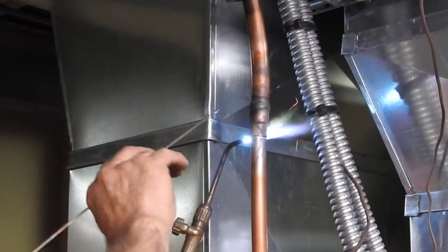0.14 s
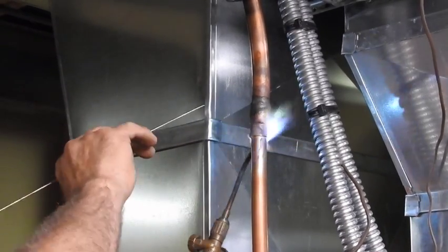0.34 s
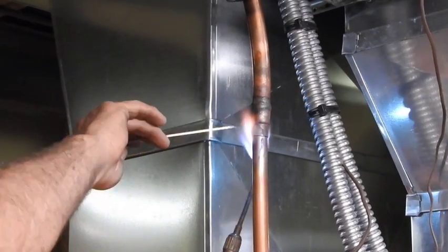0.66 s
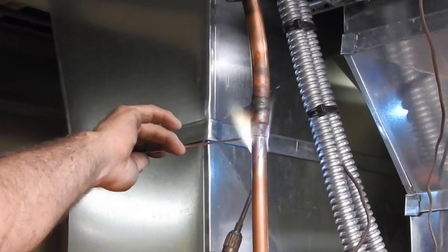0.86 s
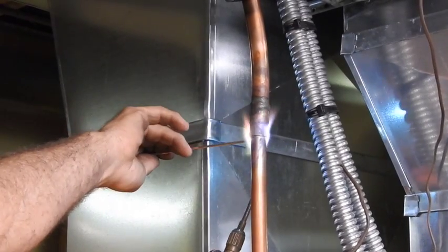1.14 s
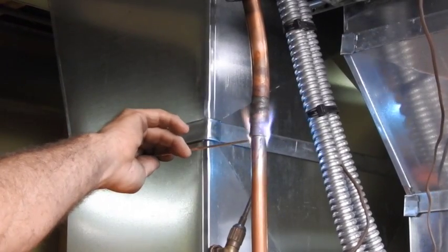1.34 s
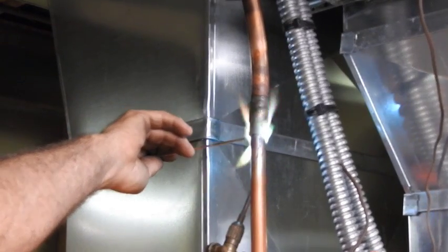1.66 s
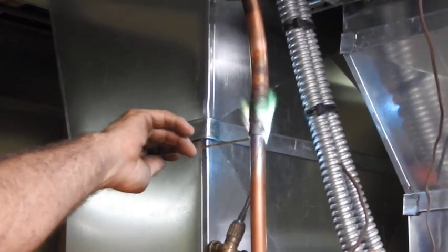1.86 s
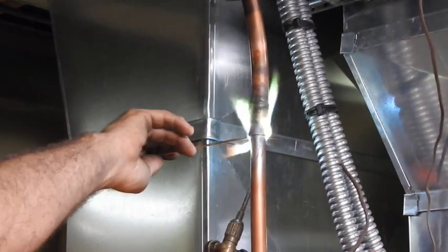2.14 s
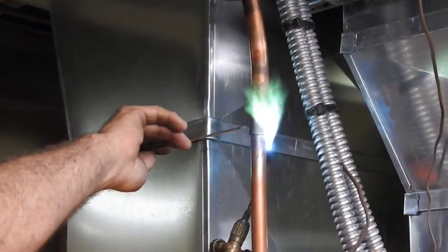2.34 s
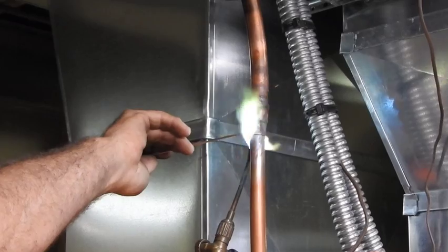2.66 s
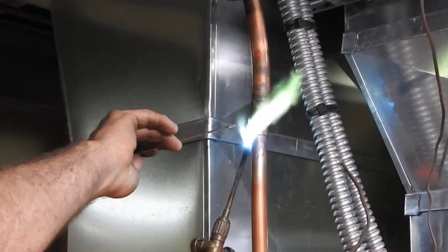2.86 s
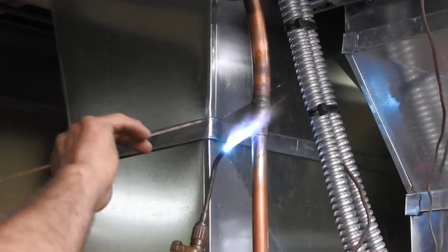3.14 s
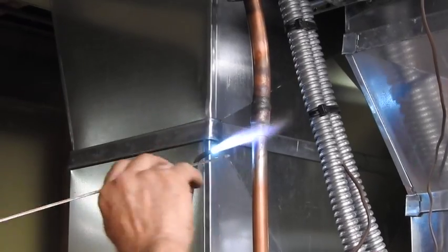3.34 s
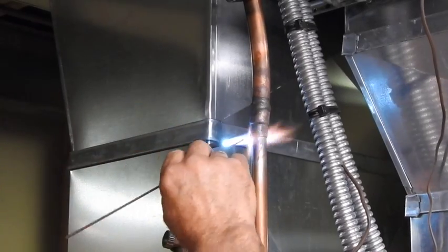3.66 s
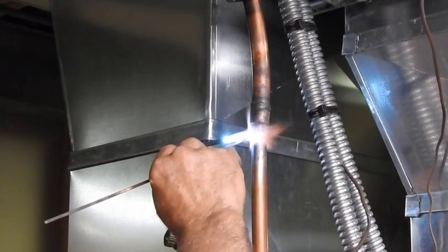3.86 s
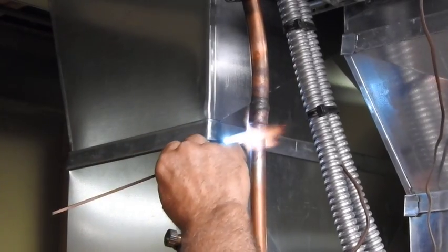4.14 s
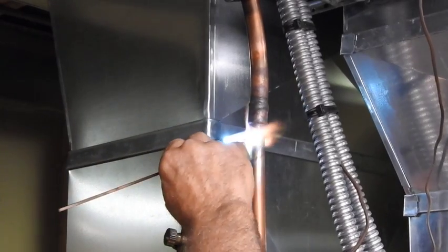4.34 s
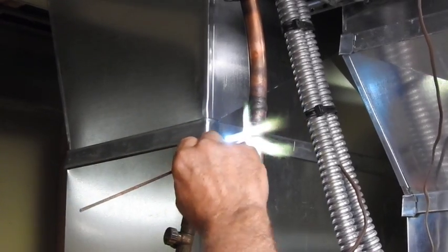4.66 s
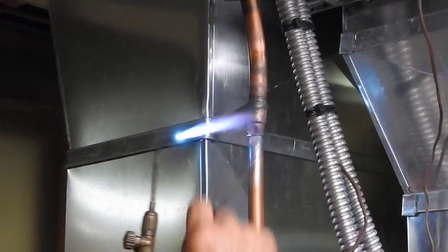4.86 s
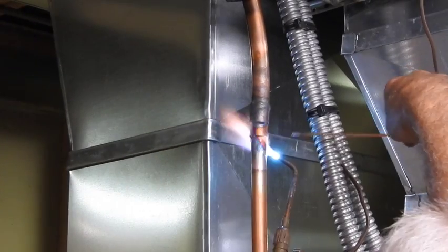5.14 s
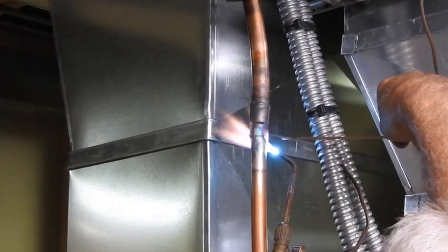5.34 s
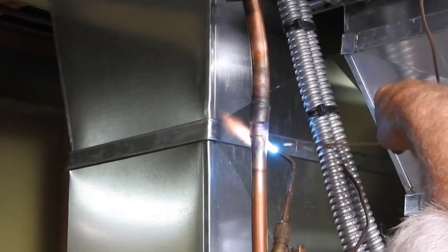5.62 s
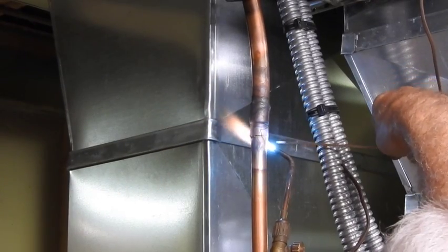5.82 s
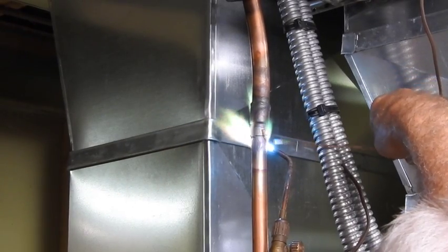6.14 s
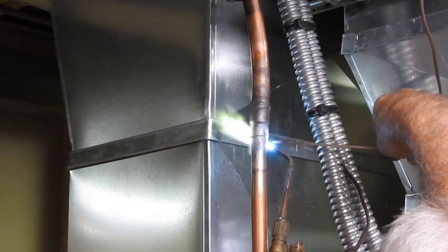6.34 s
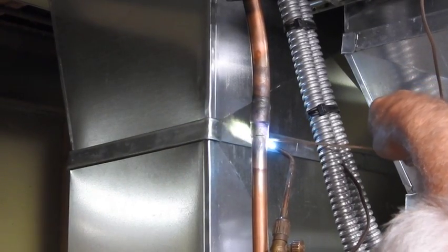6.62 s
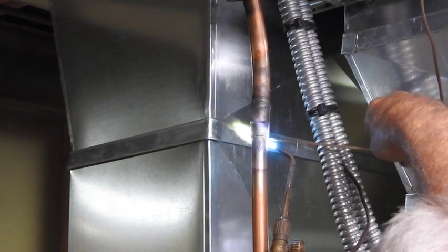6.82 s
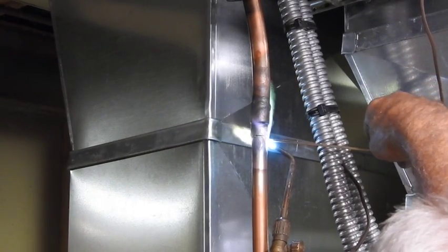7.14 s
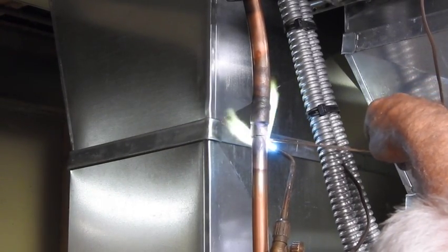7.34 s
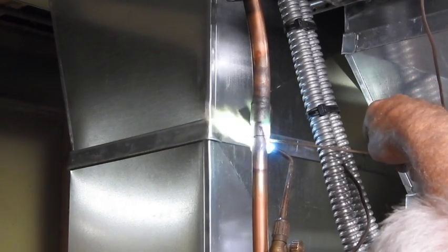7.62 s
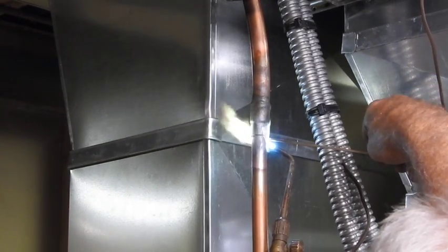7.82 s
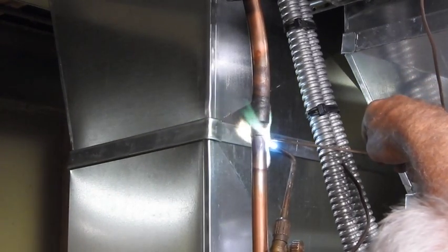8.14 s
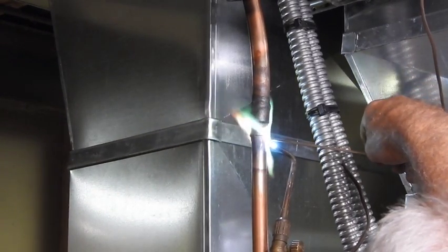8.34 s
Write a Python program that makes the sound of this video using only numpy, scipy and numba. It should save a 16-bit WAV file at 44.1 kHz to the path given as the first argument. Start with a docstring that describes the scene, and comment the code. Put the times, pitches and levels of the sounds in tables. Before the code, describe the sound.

A brazing torch gives a high hiss, soft roar and faint whistles, the hiss jumping louder about five seconds in.

```python
"""A gas torch brazes a copper pipe joint among sheet-metal ducts.
The burning gas roars low and the jet hisses very high, whistling where it grazes the metal.
The pipe and ducts ring and echo, colouring both. A motor hums nearby and the room rumbles faintly.
After about 5 s the same work switches to half speed: all is an octave lower,
and the top of the jet, too high to hear before, becomes a loud hiss."""
import sys
import numpy as np
from scipy import signal
from scipy.fft import rfft, irfft, next_fast_len
from scipy.io import wavfile
from scipy.ndimage import uniform_filter1d
from numba import njit

SR = 44100
rng = np.random.default_rng(int(sys.argv[2]) if len(sys.argv) > 2 else 0)


def inscribe(sig):
    """Save sig as 16-bit PCM at rate SR to the path in sys.argv[1].

    A 1-D sig is mono; a 2-D sig holds one channel per row.
    Samples are clipped to [-1, 1] before scaling.
    """
    pcm = np.round(np.clip(np.atleast_2d(sig).T, -1, 1) * 32767)
    wavfile.write(sys.argv[1], SR, pcm.astype(np.int16))


N = 374409
T = np.arange(N) / SR
SIZE = next_fast_len(N)
HZ = np.maximum(np.arange(SIZE // 2 + 1) * SR / SIZE, 1)  # the pitch of each point in a spectrum
TOP_HZ = 15800
EARS = np.array([[1], [-1]])  # adds to the left ear, takes from the right


def torch(speed, rush_db, rush_share, flutter_db):
    """Burning gas roars (low), flame rushes round the pipe (middle) and the jet hisses (high)."""
    # Strength of the flame's roar at full and half speed: time_s, level_db
    roar_full = [(0, -50.5), (0.08, -41), (0.17, -41.5), (0.3, -41), (0.42, -42), (0.58, -42), (0.85, -44),
                 (1.02, -44.5), (1.25, -46), (2.17, -49.5), (2.29, -42.5), (2.52, -44.5), (2.59, -49),
                 (2.7, -44), (2.86, -46.5), (2.98, -43), (3.28, -42), (3.5, -41.5), (3.62, -45.5),
                 (3.72, -41.5), (3.85, -44.5), (4.72, -46), (4.92, -42.5)]
    roar_slow = [(4.96, -44.5), (5.3, -43.5), (5.62, -43), (5.73, -47), (5.88, -45), (6.4, -43.5),
                 (6.53, -51.5), (6.7, -47.5), (6.97, -46.5), (7.15, -50.5), (7.37, -49.5), (7.5, -43.5),
                 (8.0, -44.5), (8.14, -50), (8.32, -48.5), (8.46, -55.5)]
    # Strength of the hiss, which rises as the jet presses on the metal: time_s, level_db
    hiss_full = [(0, -27), (.3, -28.5), (.42, -26), (.5, -27.3), (.68, -24.5), (.75, -25), (.85, -25.5),
                 (1.32, -25.2), (1.42, -28.3), (1.58, -25), (2.05, -25), (2.3, -24.8), (2.55, -25.5),
                 (2.8, -25), (3.03, -26.5), (3.4, -29), (3.54, -25), (3.95, -25), (4.15, -26), (4.92, -26)]
    hiss_slow = [(4.96, -20.5), (5.6, -19.5), (6.35, -18), (6.65, -18.5), (6.9, -18.5), (7.3, -19),
                 (7.5, -19.5), (8.05, -19), (8.48, -19)]
    roar_db = over_time(roar_full if speed == 1 else roar_slow)
    hiss_db = over_time(hiss_full if speed == 1 else hiss_slow)
    usual_roar_db = -42.5
    swell_db = roar_db - usual_roar_db
    gas = turbulence(speed)
    gas = duct_echoes(gas, speed)
    gas = jet_whistles(gas, speed)
    gas = pipe_colour(gas, speed)
    # A stronger flame also roars deeper.
    gas = boost(gas, hz=312 * speed, sharpness=2.836, db=2.5 * np.maximum(swell_db, 0))
    spectrum = rfft(gas, SIZE)
    borders_hz = [0, 850 * speed, 6000 * speed, TOP_HZ]  # roar, rush and hiss lie between these
    levels_db = [roar_db, rush_db + rush_share * swell_db, hiss_db]
    sound = 0
    for low, high, db, depth_db in zip(borders_hz, borders_hz[1:], levels_db, flutter_db):
        band = steady(to_sound(spectrum * ((HZ >= low) & (HZ < high))))
        sound = sound + band * gain(db + depth_db * wander(38 * speed))  # each flutters on its own
    return flares_and_falters(sound)


def turbulence(speed):
    """Spectrum of swirling gas ringing the metal; its treble reaches the ears by different paths."""
    # Tone balance of the gas noise: full_speed_pitch_hz, full_speed_db, half_speed_db
    gas_balance = [(70.0, -60, -48.0), (155.0, -43, -39), (237, -39, -36), (356, -27.5, -25),
                   (700, -30, -25), (910, -34, -34), (2350, -29.5, -32.5), (3900, -28.5, -28.5),
                   (6770, -27, -28), (8000, -29.5, -29.5), (9220, -23.5, -23.5), (16100, -14.5, -11.5),
                   (19840, -6, -10.5), (25200, -19.0, -18), (26700, -29.0, -29.5), (28000, -29.5, -28),
                   (29800, -50.0, -63)]
    # Ringing of the ducts, pipe and nozzle:
    # full_speed_pitch_hz, half_width_hz, full_speed_boost_db, half_speed_boost_db
    resonances = [(505, 54, 8, 9), (642, 92, 7, 5.5), (975, 24, 9.5, 10), (1099, 45, 10.5, 12.5),
                  (1236, 53, 8.5, 10.5), (1444, 39, 6.5, 6), (1610, 164, 4.5, 5.5), (1668, 24, 7, -3),
                  (2050, 73, 7, 10), (2550, 28, -2, 6.5), (2675, 26.0, 0, 5.5), (3150, 110.0, 3.5, 5.5),
                  (3650, 270, 4, 4.5), (4720, 64, 0.5, 4), (5210, 130, 0.5, 4.0), (5470, 120, 4, 3),
                  (6140, 280, 0, 8), (6980, 490, 2.5, 6.5), (8700, 260, 2, 8), (9690, 700, 1, 10.5),
                  (11460, 310, 1.5, 5.5), (12100, 220, -0.5, 2.5), (13020, 330, 1.5, 3),
                  (13920, 130, 2, 5.5), (16250, 440, -1, 7.5), (17684.0, 350, 4.5, 3), (18880, 340, 6, 7),
                  (20540, 490, -2, 3), (23100, 297.0, 1.0, -1)]
    # How strong the ears' difference is next to what they share: pitch_hz, level_db
    width_full = [(200, -24), (500, -34), (1000, -38), (1600, -22), (2000, -27), (2600, -23), (4400, -17.5),
                  (6300, -21), (7300, -28), (8500, -10.5), (12000, -12), (13500, -6), (15500, -6)]
    width_slow = [(200, -32), (600, -25), (1000, -21), (2500, -21), (4000, -28), (5000, -30), (5800, -11),
                  (6600, -9), (7300, -5), (8200, -4), (13000, -2.5)]
    # How much louder the left ear is than the right: pitch_hz, level_db
    lean_full = [(900, 0), (1600, .6), (3600, -2), (7000, -.2), (11000, -.6), (13000, -1.5), (15500, -2)]
    lean_slow = [(800, .1), (1400, -1.8), (2700, -2.7), (4200, 0), (5800, -.3), (9200, -3.4), (11000, .3)]
    width, lean, column = (width_full, lean_full, 1) if speed == 1 else (width_slow, lean_slow, 2)
    db = over_pitch(gas_balance, column, speed)
    for hz, half_width_hz, *boosts_db in resonances:
        peak = np.exp(-((HZ - hz * speed) / (half_width_hz * speed)) ** 2)
        db = db + boosts_db[column - 1] * peak
    mid, side = rfft(rng.standard_normal((2, SIZE)))
    # Echoes from close by shift the wave's timing between the ears.
    near_echoes = echo_tail(fade_s=.012)
    shift = 1j * np.sqrt(2) * near_echoes.imag
    shared = .4
    side = np.sqrt(shared) * mid * shift + np.sqrt(1 - shared) * side
    stereo = mid + EARS * side * gain(over_pitch(width))
    return gain(db + EARS * over_pitch(lean) / 2) * stereo


def flares_and_falters(sound):
    """The flame flares where it splashes past the pipe, and now and then it falters."""
    # Flares of the flame: start_s, end_s, pitch_hz, boost_db, sharpness
    flares = [ (0.06, 0.12, 320, 9, 2.1), (0.21, .32, 310, 8, 2.8), (.08, .34, 950, 3.5, 3.9),
              (2.33, 3.8, 320, 3, 2.64), (2.94, 3.596, 1490, 2.5, 3.1), (4.963, 5.696, 1590, 3.5, 1.6),
              (6.196, 6.415, 1400, 0, 1.6), (6.818, 7.017, 960, 2.5, 2.8), ]
    # Brief dips of the flame: middle_s, length_s, pitch_hz, boost_db, sharpness
    falters = [(0, 0.15, 4200, -4.5, 0.91), (2.126, 0.12, 950, -4, .9), (2.564, 0.12, 2400, -8, 0.59)]
    for start_s, end_s, hz, db, sharpness in flares:
        sound = boost(sound, hz, sharpness, db * hold(start_s, end_s))
    for middle_s, length_s, hz, db, sharpness in falters:
        sound = boost(sound, hz, sharpness, db * bump(middle_s, length_s))
    return sound


def jet_whistles(gas, speed):
    """Grazing an edge, the jet sings a tone that swells, glides and fades; at times it squeals."""
    # The jet grazes the pipe or the rod: start_s, end_s, start_hz, end_hz, boost_db, sharpness
    grazes = [ (0.3, 0.66, 12700, 11600, 5.5, 27), (0.55, 0.89, 14700, 14850, 3, 30),
              (0.55, 2.65, 11500, 11550, 7.5, 27), (0.65, 2.5, 15150, 15450, 5, 13),
              (2.17, 2.53, 12700, 12300, 4.5, 9), (2.48, 2.98, 15700, 15500, 7, 29),
              (3.42, 4.15, 10350, 10200, 2, 14), (3.4, 5, 12900, 13600, 6, 9),
              (3.55, 4.7, 15650, 15600, 4, 45), (4.9, 6.9, 8800, 8950, 3, 25),
              (5.1, 5.7, 10380, 10250, 3.5, 40), (5.65, 6.3, 9860, 10450, 5, 26),
              (6.12, 6.52, 11850, 12300, 5, 28), (6.32, 6.62, 8800, 8800, 5, 50),
              (6.1, 6.2, 8200, 8240, 3, 30), (6.55, 7.9, 9600, 9440, 5.5, 35),
              (7.08, 7.3, 10800, 10930, 2.5, 12), (7.7, 9.1, 8250, 8120, 0.5, 30),
              (8.18, 8.2, 10700, 11100, 2.5, 12), ]
    # Brief squeals of the jet: middle_s, length_s, pitch_hz, boost_db, sharpness
    squeals = [(6.888, 0.029, 9500, 9, 36), (7.238, .019, 9350, 10.5, 32), (7.43, 0.069, 3450, 7.5, 9),
               (7.556, 0.11, 3550, 7, 9.9)]
    waver = 1 + .004 * wander(10 * speed)  # the unsteady hand bends the pitch
    for start_s, end_s, start_hz, end_hz, db, sharpness in grazes:
        progress = np.clip((T - start_s) / (end_s - start_s), 0, 1)
        arch = 2 * np.sqrt(progress * (1 - progress))
        pitch_hz = (start_hz + progress * (end_hz - start_hz)) * waver
        gas = boost(gas, pitch_hz, sharpness, db * arch)
    for middle_s, length_s, hz, db, sharpness in squeals:
        gas = boost(gas, hz, sharpness, db * bump(middle_s, length_s))
    return gas


def pipe_colour(gas, speed):
    """The pipe blocks or reflects certain pitches, depending on which side the torch faces."""
    # Bands the pipe weakens or strengthens: start_s, end_s, pitch_hz, boost_db, sharpness
    facings = [ (0.9, 1.9, 3300, -4, 6.4), (0, 2.5, 3710, 2.5, 16), (3, 3.45, 5950, 4, 17),
               (6.5, 8.6, 4900, 1.5, 14), (5.5, 7.9, 5950, -1, 6), (0.7, 3, 13500, -1, 26),
               (0.4, 2.93, 8020, -1, 20), (0.9, 2.93, 4660, 4, 11), (2.5, 3.35, 1350, -4, 1.5),
               (3, 3.8, 5270, -4.5, 9.7), (3.34, 5.2, 3820, 3, 9), (2.3, 4.93, 3210, 3.5, 9.6),
               (1.8, 2.9, 5500, 2, 14), (-0.5, .6, 5700, -2.5, 3.5), (3.5, 4.93, 12300, -6.5, 18),
               (6, 5.9, 6400, 2, 7), (4.5, 5.5, 8200, -2, 12), (4.5, 8.6, 530, -2, 2.2), ]
    for start_s, end_s, hz, db, sharpness in facings:
        gas = boost(gas, hz, sharpness, db * hold(start_s, end_s))
    # Wrapped round the pipe, the flame rings hollow and throbs.
    ring_db = 6 + 1.3 * wander(30 * speed)
    return boost(gas, hz=2146, sharpness=22, db=ring_db * hold(start_s=.27, end_s=3.55))


def duct_echoes(spectrum, speed):
    """Turn the gas spectrum into sound with echoes off the ducts, which shift as the torch moves."""
    # The hand works the torch round the joint: time_s, angle_radians
    positions = [(0, 1.3), (.4, 1.2), (.7, 2.16), (2.88, 2.63), (3.02, 3.25), (3.6, 3.4), (4.9, 3.7),
                 (5.6, 5.55), (8.5, 5.3)]
    tremor_radians = .3 * wander(5 * speed)
    angle = over_time(positions) + tremor_radians
    reflected = .84 * HZ / (HZ + 1800 * speed)  # small panels reflect high pitches best
    sound = to_sound(spectrum)
    for facing in (np.cos(angle), np.sin(angle)):
        echoes = echo_tail(fade_s=.081 / speed)
        sound = sound + facing * to_sound(spectrum * reflected * echoes)
    return sound


def motor(pitch_hz, level_db=-55.5, right_louder_db=1.5):
    """A motor hums one steady tone, a little to the right."""
    ear_gains = gain(level_db - EARS * right_louder_db / 2)
    return np.sqrt(2) * ear_gains * np.sin(2 * np.pi * pitch_hz * T)


def room(level_db=-85, below_hz=130, width_db=-8):
    """The room rumbles faintly from all round."""
    noise = rfft(rng.standard_normal((2, SIZE)))
    mid, side = to_sound(noise / (1 + (HZ / below_hz) ** 2))
    rumble = mid + EARS * gain(width_db) * side
    return gain(level_db) * rumble / np.sqrt(np.mean(mid ** 2))


def gain(db):
    """Turn decibels into a number to multiply by."""
    return 10 ** (np.asarray(db) / 20)


def to_sound(spectrum):
    """Turn a two-channel spectrum into samples."""
    return irfft(spectrum, SIZE)[:, :N]


def over_time(points):
    """Join (time_s, value) points with straight lines."""
    return np.interp(T, *np.transpose(points))


def over_pitch(points, column=1, speed=1):
    """Join one column of a table across the spectrum; a lower speed moves it down in pitch."""
    points = np.array(points)
    return np.interp(np.log(HZ / speed), np.log(points[:, 0]), points[:, column])


def wander(rate_hz):
    """A smooth random drift, typically about 1 either side of zero."""
    step = max(int(SR / rate_hz), 1)
    held = np.repeat(rng.standard_normal(N // step + 1), step)
    return 1.5 * uniform_filter1d(uniform_filter1d(held, step), step)[:N]


def hold(start_s, end_s, ease_s=.08):
    """Ease in from 0, stay at 1, ease out."""
    return np.clip(np.minimum(T - start_s, end_s - T) / ease_s + .5, 0, 1)


def bump(middle_s, length_s):
    """A brief, smooth rise and fall."""
    return np.maximum(1 - (2 * (T - middle_s) / length_s) ** 2, 0) ** 2


def echo_tail(fade_s):
    """Spectrum of many random echoes that die away by 60 dB in fade_s."""
    echoes = rng.standard_normal(N) * gain(-60 * T / fade_s)
    return rfft(echoes / np.sqrt(np.sum(echoes ** 2)), SIZE)


def steady(sound):
    """Even out the level over each half second, so a change of colour leaves the loudness alone."""
    return sound / np.sqrt(uniform_filter1d(sound.mean(0) ** 2, SR // 2))


def boost(sound, hz, sharpness, db):
    """Raise one band of pitches, or lower it if db is negative; a sharper band is narrower."""
    result = sound.copy()
    active = np.abs(db) > .01
    if active.any():
        centre_hz = (hz * np.ones(N))[active]
        band = band_pass(np.ascontiguousarray(sound[:, active]), centre_hz, float(sharpness))
        result[:, active] += (gain(db[active]) - 1) * band
    return result


@njit
def band_pass(x, hz, sharpness):
    """Let through only the pitches near hz, which may move every sample."""
    y = np.zeros(x.shape)
    for i in range(2, len(hz)):
        turn = 2 * np.pi * hz[i] / SR
        keep = 1 / (1 + np.tan(turn / sharpness / 2))
        for ear in range(len(x)):
            push = (1 - keep) * (x[ear, i] - x[ear, i - 2])
            y[ear, i] = push + 2 * keep * np.cos(turn) * y[ear, i - 1] - (2 * keep - 1) * y[ear, i - 2]
    return y


def scene():
    """Torch and motor at full speed, then suddenly at half speed, over the room's rumble."""
    full = torch(speed=1, rush_db=-38.5, rush_share=.14, flutter_db=(1.3, .4, .45))
    slow = torch(speed=.5, rush_db=-39, rush_share=.47, flutter_db=(.9, .5, .25))
    full += motor(pitch_hz=118.305)
    slow += motor(pitch_hz=59.75)
    switch_s, fade_s = 4.939, .014
    fade = np.pi / 2 * np.clip((T - switch_s) / fade_s + .5, 0, 1)
    return np.cos(fade) * full + np.sin(fade) * slow + room()


def record(dry):
    """The treble drops away steeply above TOP_HZ."""
    return signal.sosfilt(signal.ellip(12, .1, 80, TOP_HZ, fs=SR, output="sos"), dry)


dry = scene()
out = record(dry)
inscribe(out)
```